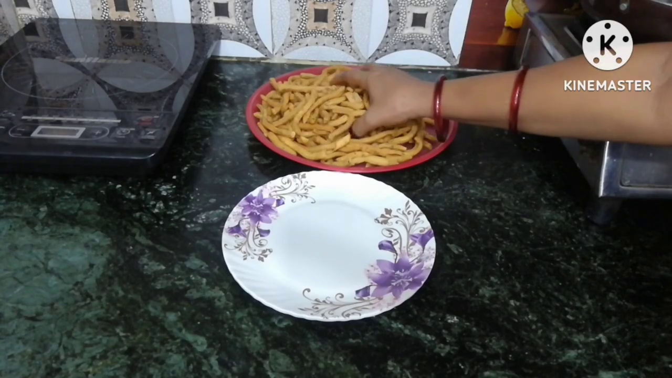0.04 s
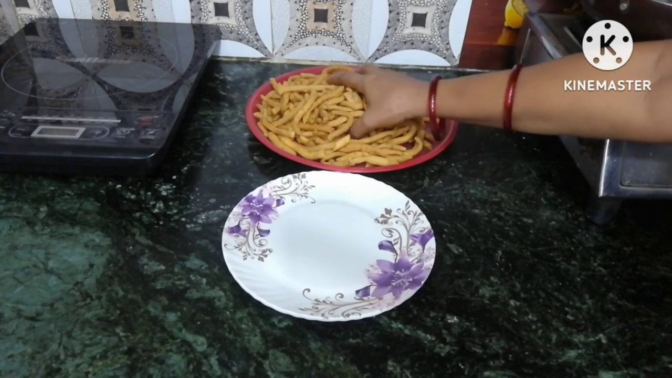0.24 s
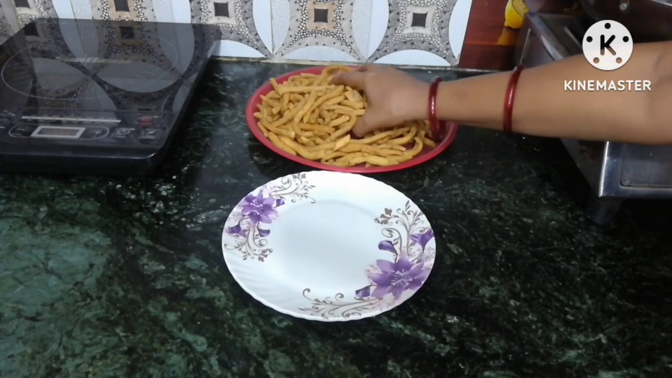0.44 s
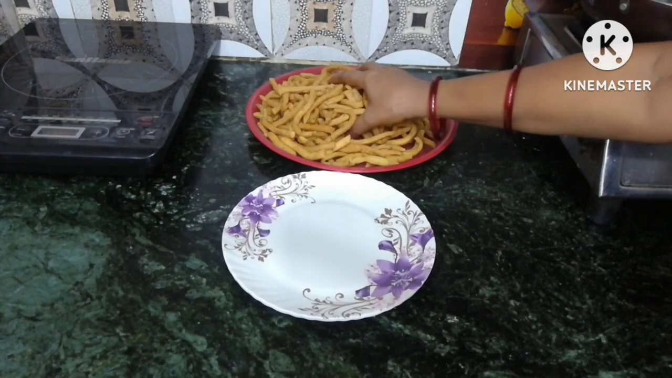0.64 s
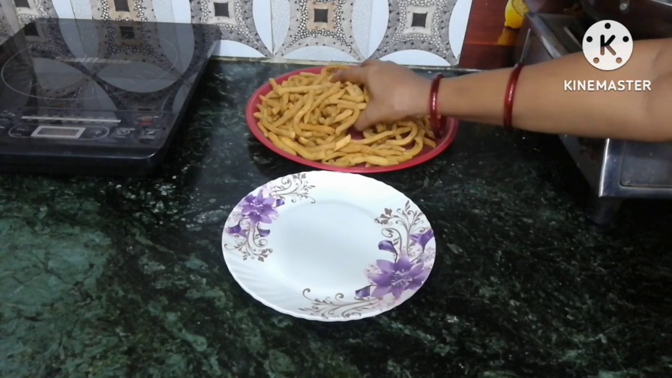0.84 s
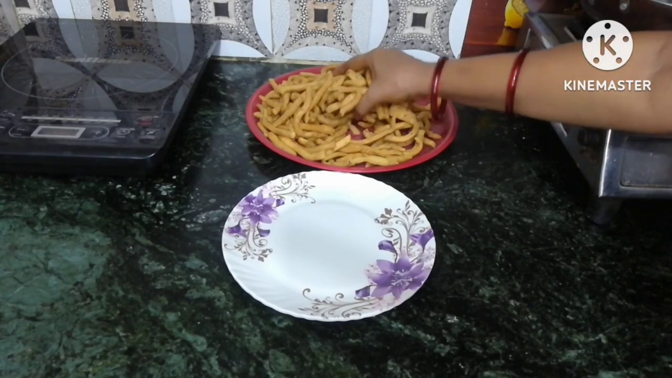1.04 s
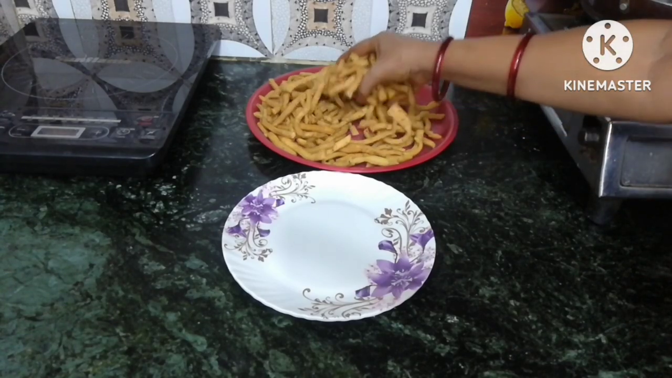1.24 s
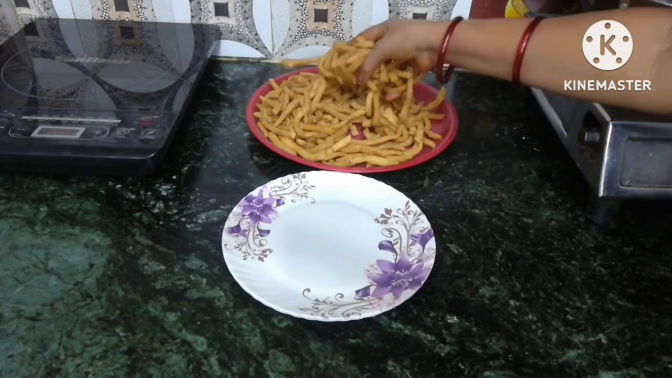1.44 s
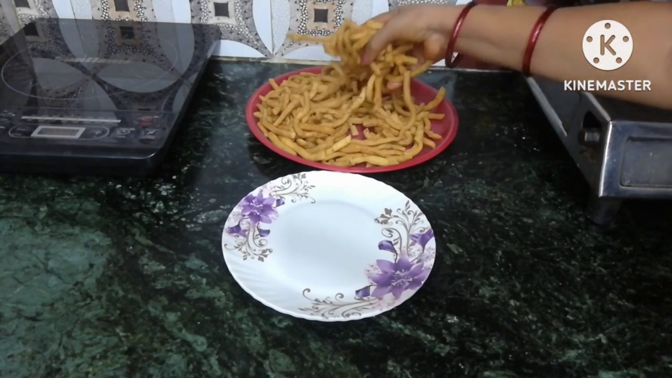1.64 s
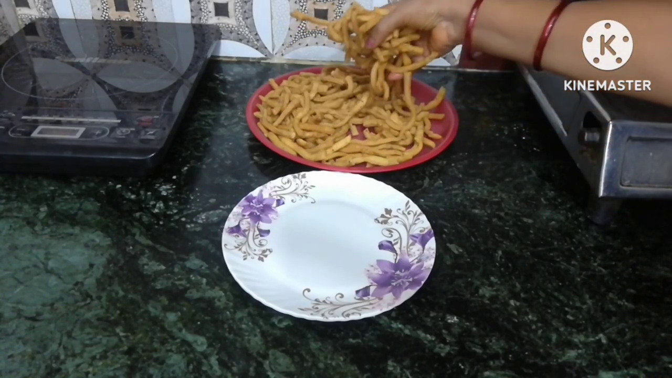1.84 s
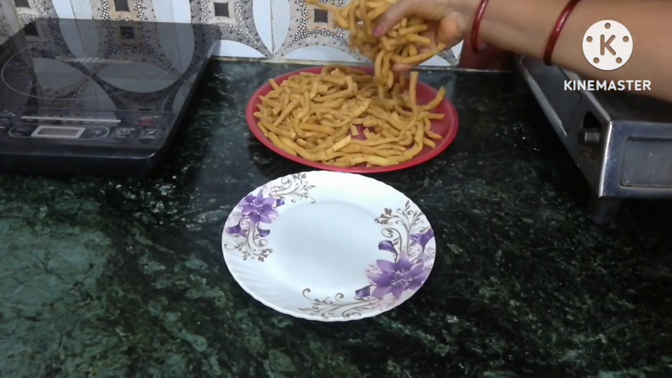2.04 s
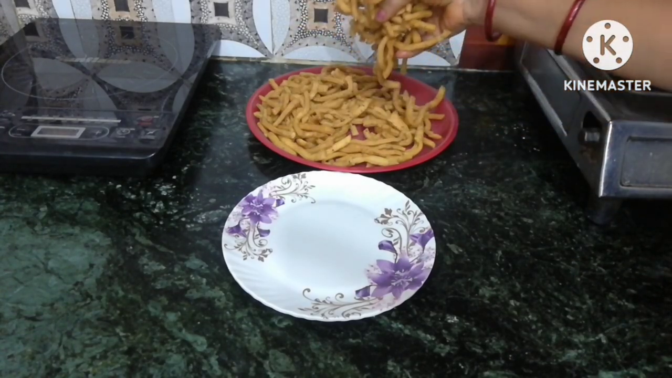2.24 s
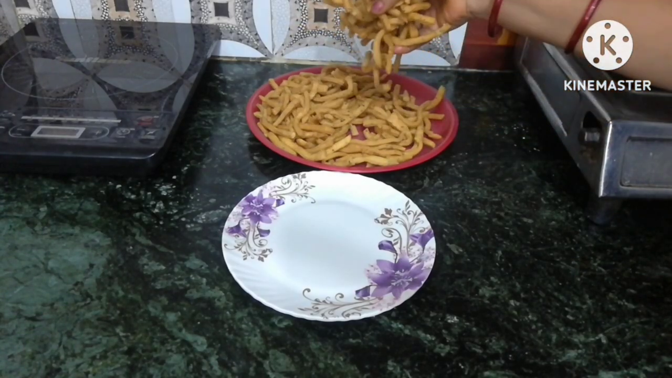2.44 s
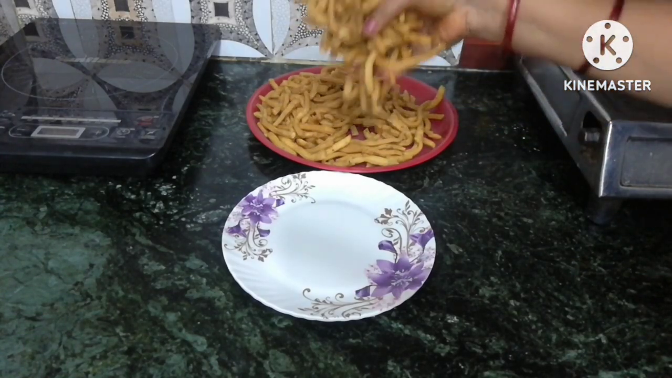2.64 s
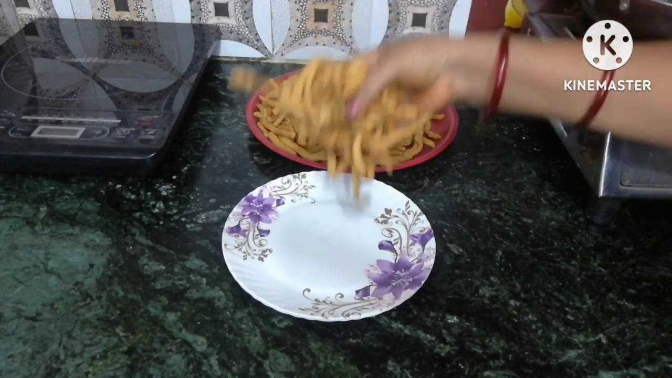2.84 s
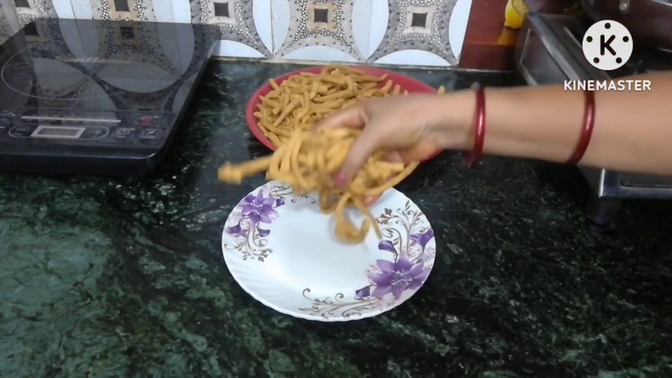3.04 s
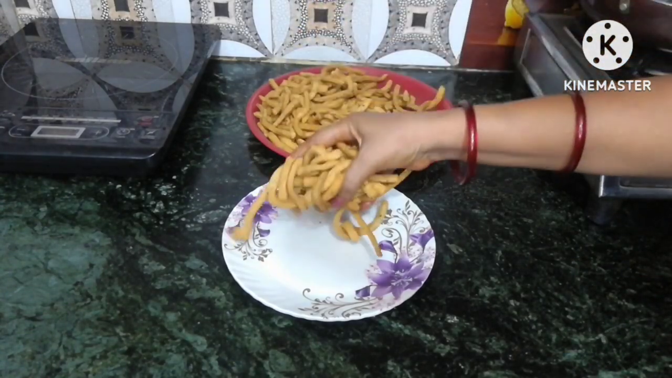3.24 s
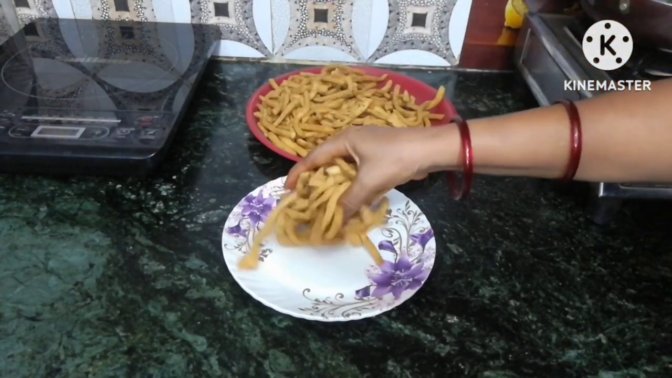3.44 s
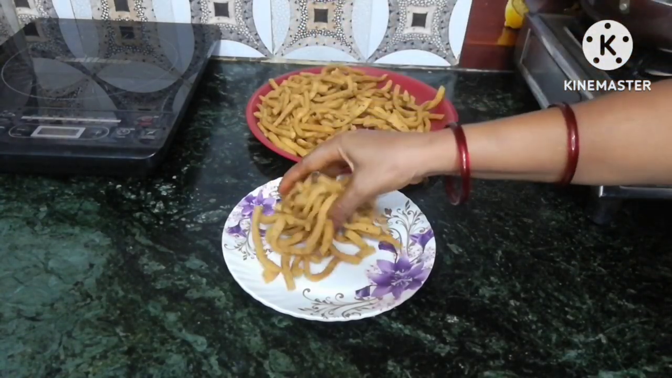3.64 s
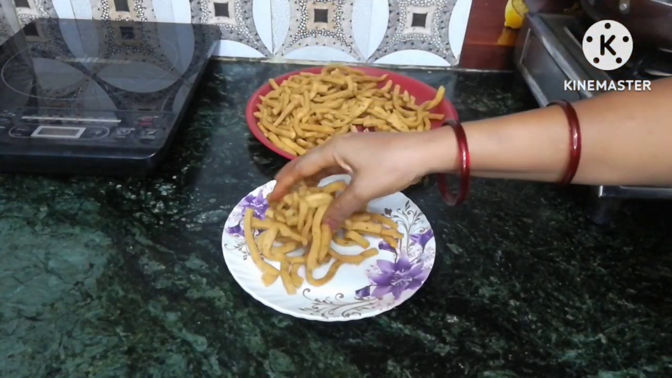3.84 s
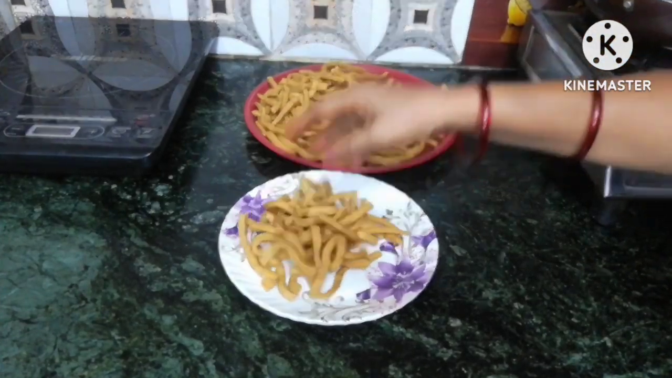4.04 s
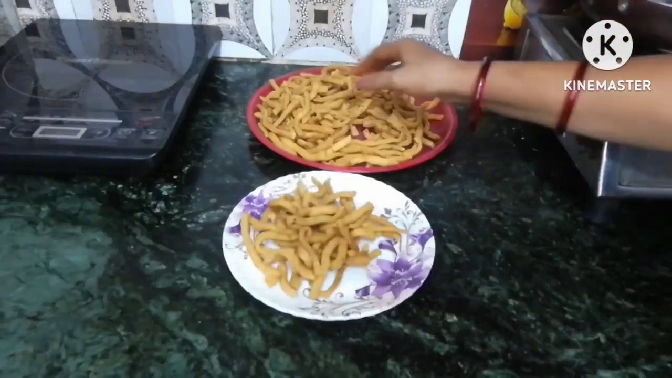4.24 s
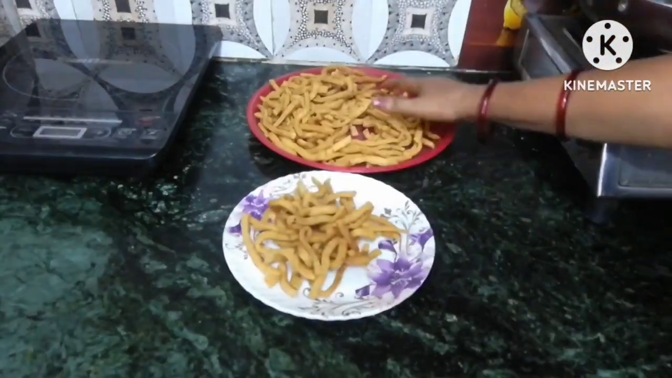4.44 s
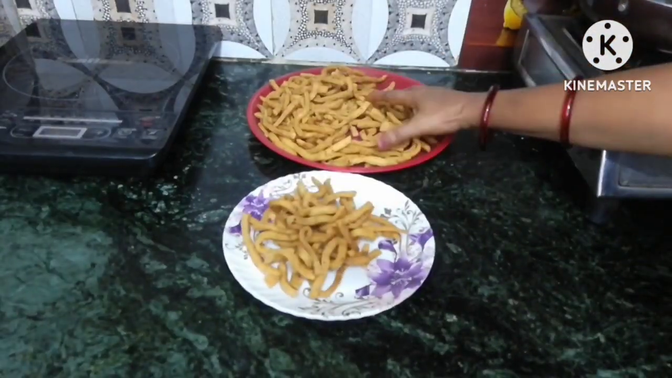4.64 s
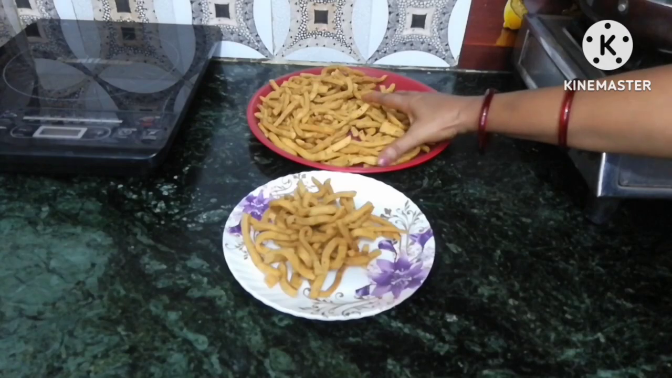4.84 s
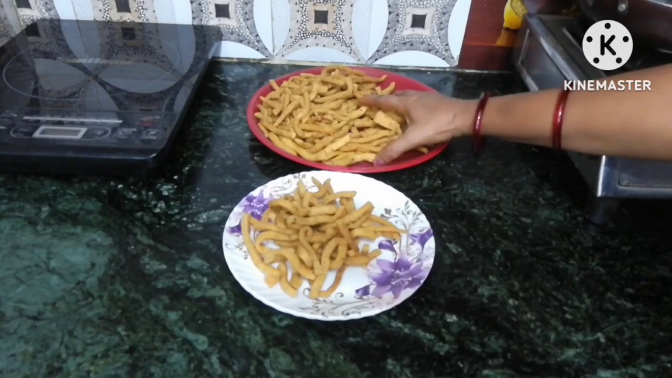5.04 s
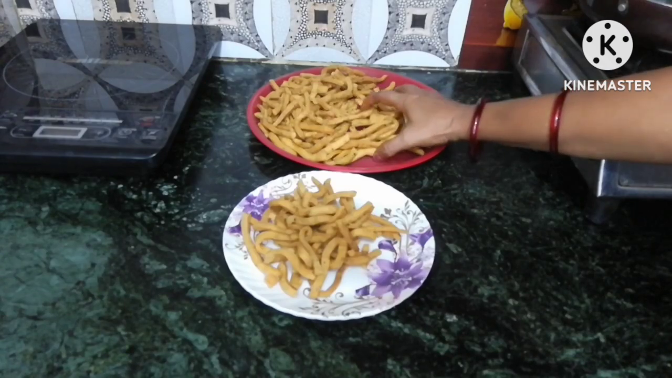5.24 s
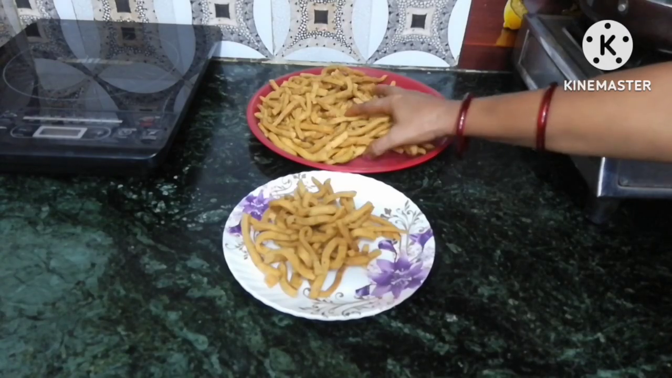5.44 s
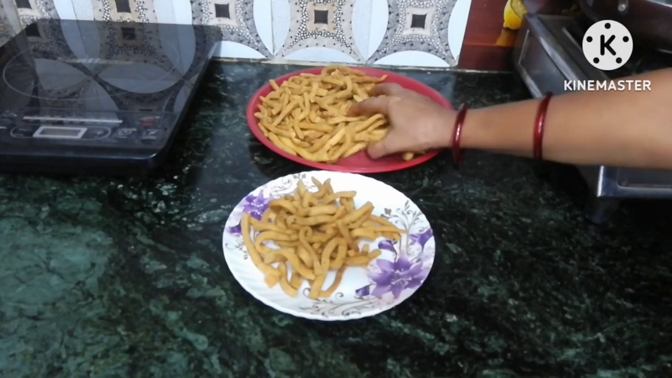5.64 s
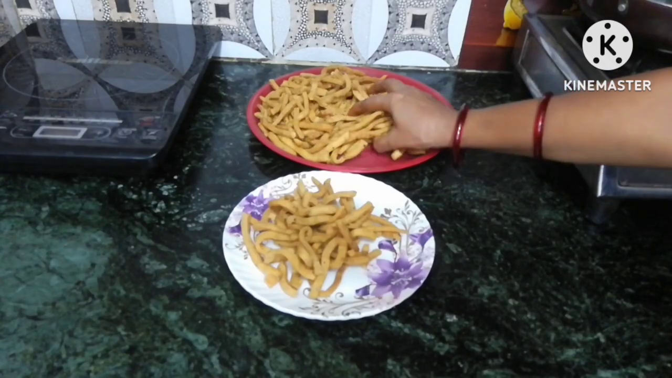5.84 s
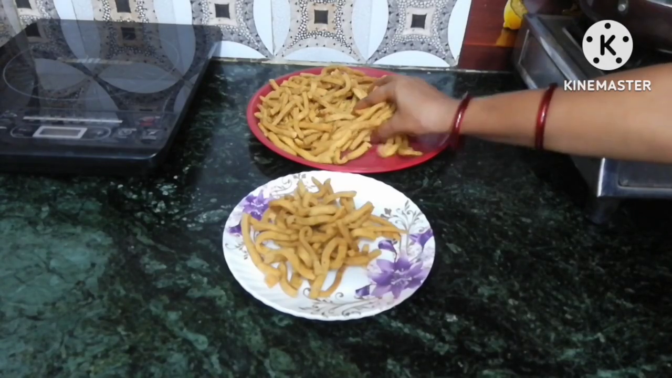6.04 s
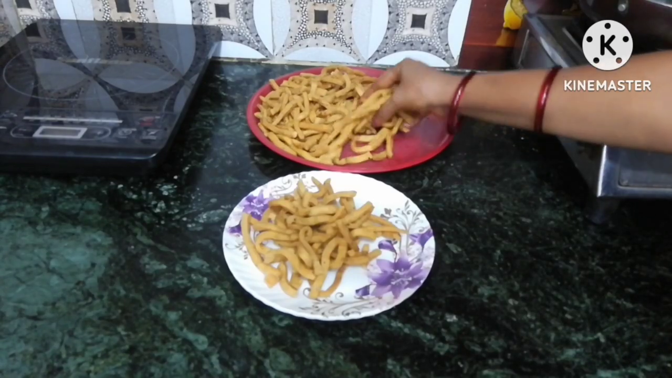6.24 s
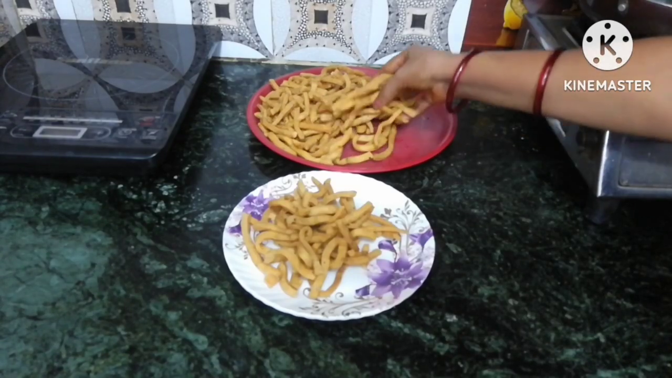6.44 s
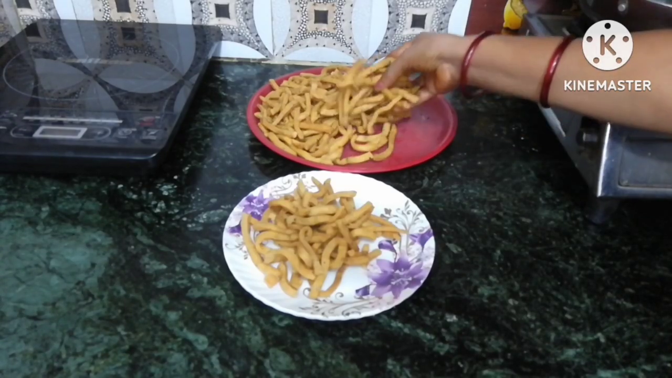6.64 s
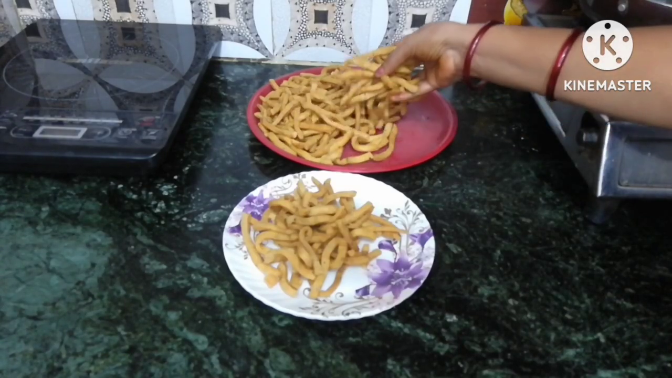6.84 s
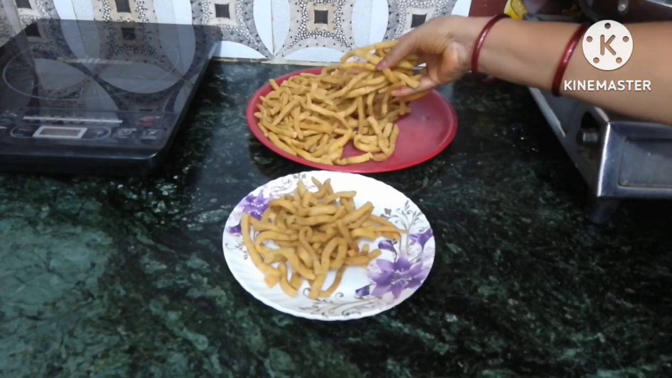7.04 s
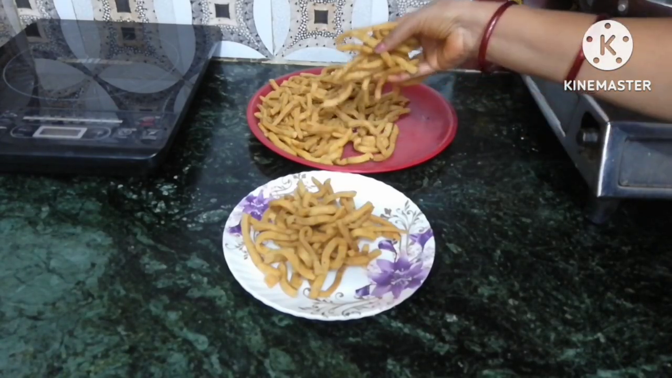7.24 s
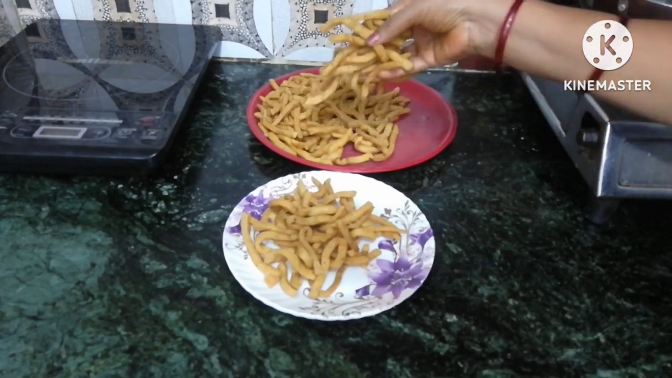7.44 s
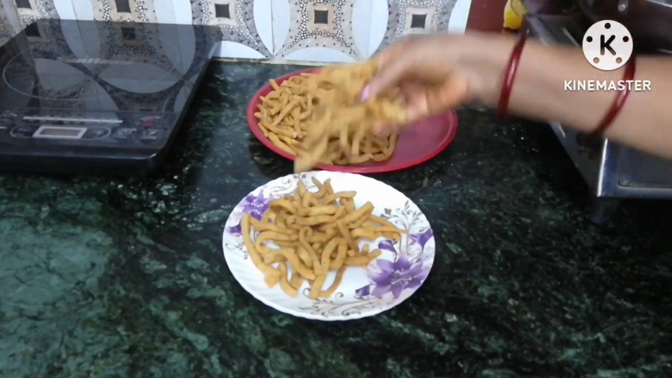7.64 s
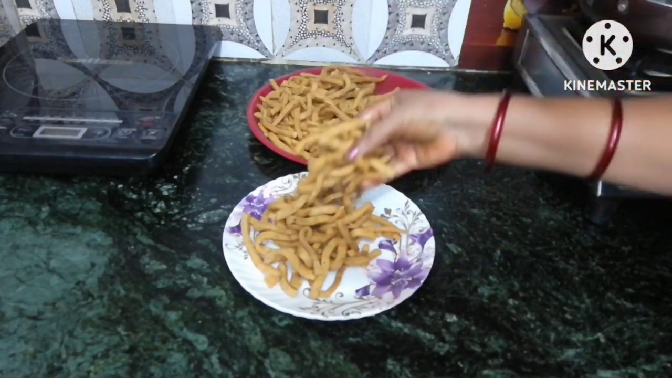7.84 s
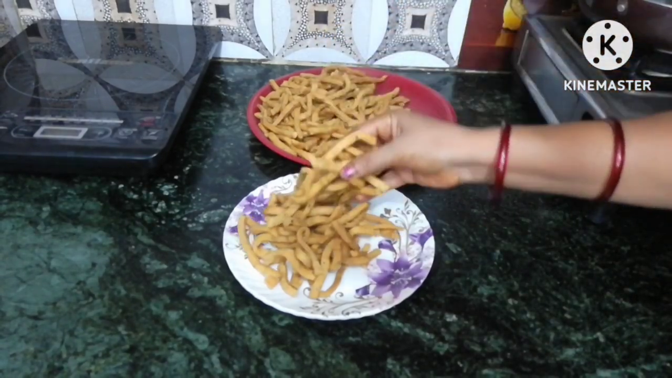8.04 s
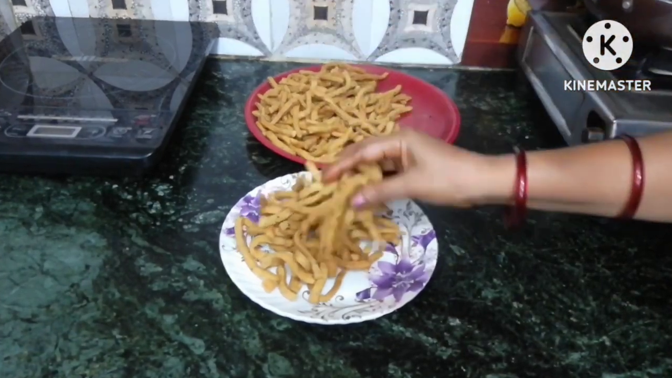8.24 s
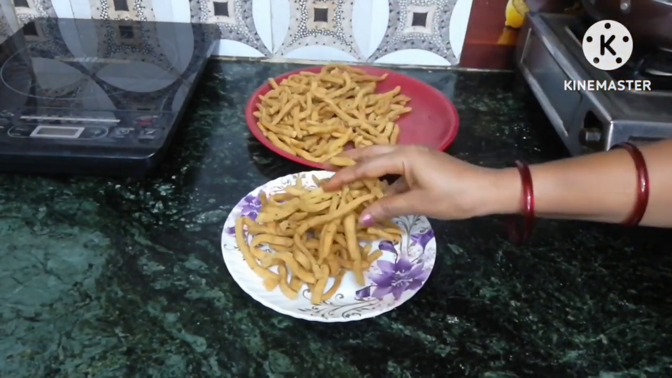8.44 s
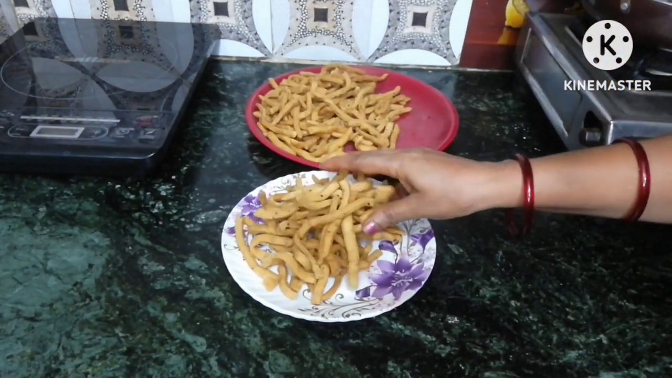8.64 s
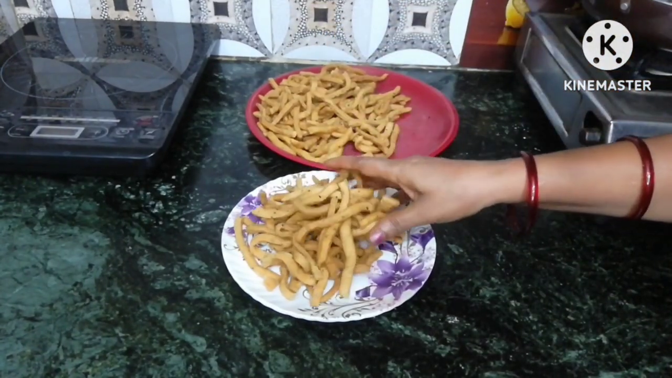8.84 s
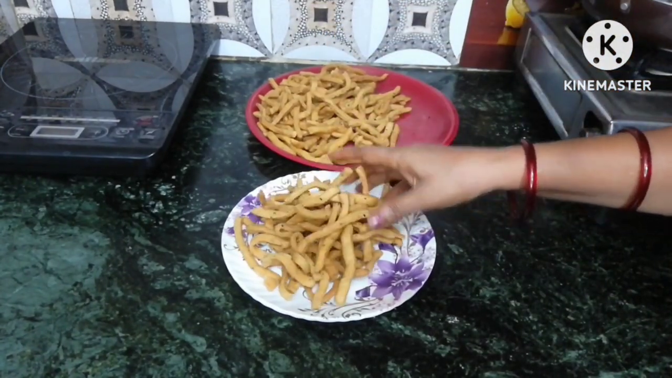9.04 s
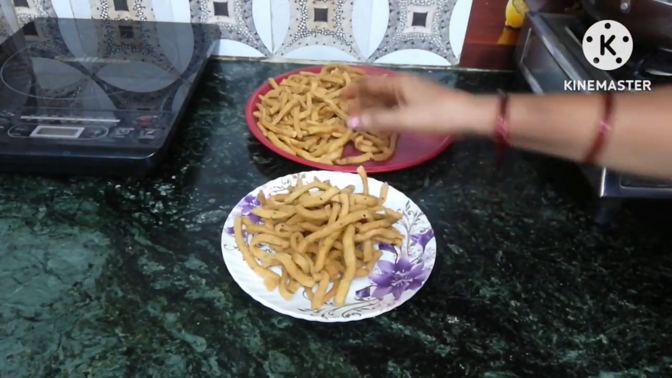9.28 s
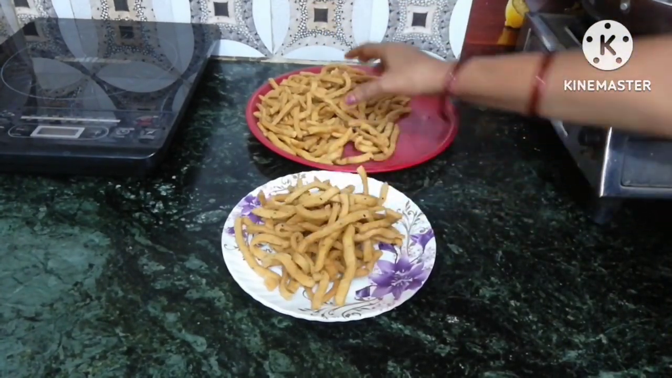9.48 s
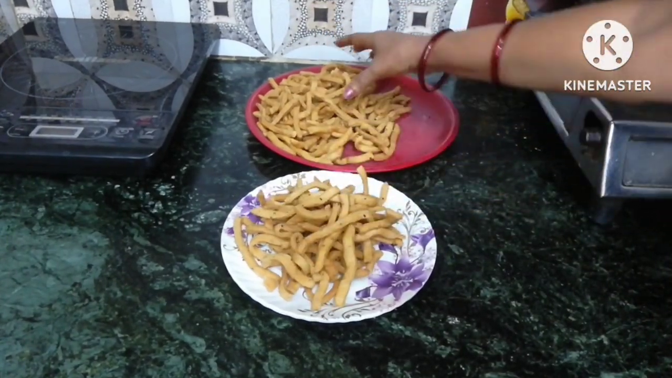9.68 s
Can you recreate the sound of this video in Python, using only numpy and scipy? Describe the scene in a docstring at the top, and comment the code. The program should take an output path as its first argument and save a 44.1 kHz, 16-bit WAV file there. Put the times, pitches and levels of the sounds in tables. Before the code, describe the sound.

A faint low hum and rumble fill a small hard-walled kitchen throughout. From the start, a hand rustles close by in crisp fried sticks on a plastic tray, with dry ticks that cluster around 1.4 seconds and then thin out. At about 3 seconds the first sticks hit a thin plate. The handful tumbles down in a bright, brittle clatter with sharp snaps, loudest from 3.4 to 3.8 seconds, and a few more pieces drop just after 4. From about 4.7 to 7.4 seconds the hand rummages in the tray again, with dense shuffling, crackles and small knocks. A fine hiss swells with the handling and lingers until about 8 seconds. A second handful lands more softly around 8.4. Near 9.2 seconds sticks click and briefly scrape the plate, followed by a light rustle and a faint low drone from 9.5.

```python
"""A small hard kitchen: crisp fried sticks go by the handful from a plastic tray to a thin plate
on a stone counter. Each landing cracks the crust and rings the modes of its dish; hard stick ends
snap on the plate. Dense small contacts make the heap shuffle, rustle and tumble.
A fine hiss swells with the handling and stays on for some seconds, over hum and house rumble.
Near the end sticks scrape the plate and a low drone sets in."""
import sys
import numpy as np
from scipy import signal
from scipy.fft import rfft, irfft, next_fast_len
from scipy.io import wavfile
from scipy.ndimage import uniform_filter1d, map_coordinates

SR = 44100
rng = np.random.default_rng(int(sys.argv[2]) if len(sys.argv) > 2 else 0)


def generate_wav(signal):
    """Clip the signal to [-1, 1] and save it as 16-bit WAV at the path in sys.argv[1]."""
    frames = np.transpose(np.atleast_2d(signal))
    scaled = np.clip(frames, -1, 1) * 32767
    pcm = np.round(scaled).astype(np.int16)
    wavfile.write(sys.argv[1], SR, pcm)


N = 428211

# Hum partials: pitch_hz, level_db
HUM_PARTIALS = [(59.2, -74.5), (118.4, -83), (199.2, -70)]
# Spectra of house noise, rumble, low hum, hiss and crust rustle: freq_hz, relative_density_db
HOUSE_SPECTRUM = [(82, -70), (140, -20.5), (202, -7.5), (236, -13), (292, -12.5), (415, -15.5),
                  (466, -14.5), (565, -26), (954, -18.5), (1160, -21.5), (1580, -22), (2070, -28),
                  (14400, -38.5)]
RUMBLE_SPECTRUM = [(12, -20), (20, 5.5), (38, -10), (100, -4.5), (129, -21), (140, -28), (180, -25),
                   (310, -120)]
LOW_HUM_SPECTRUM = [(70, -51), (88, 10.5), (105, -7.5), (120, 6), (140, -29.5)]
HISS_SPECTRUM = [(880, -51), (1500, -4.5), (1860, -10.5), (2170, -3), (2520, -7.5), (5330, -6),
                 (8080, -6.5), (13600, -19.5), (14400, -93)]
CRUST_SPECTRUM = [(1500, -30), (2500, -4), (3500, 0), (6000, -4), (9000, -16), (13000, -36)]
# Low hum envelope: time_s, level_db
LOW_HUM_LEVELS = [(0.0, -65), (0.75, -72.5), (1.43, -62), (2.08, -70.5), (3.32, -68), (3.57, -52),
                  (3.97, -69.5), (4.27, -57), (4.33, -74), (4.81, -61), (4.89, -70), (5.46, -58.5),
                  (5.6, -69), (6.63, -70.5), (6.68, -58.5), (7.38, -78), (8.11, -67), (9.71, -65)]
# Left-right likeness of noise: freq_hz, correlation
STEREO_CORRELATION = [(60, 0.99), (200, 0.93), (400, 0.35), (700, 0.017), (3000, 0.016)]
# Kitchen decay: freq_hz, t60_s
ROOM_DECAY = [(400, 0.37), (1000, 0.33), (3000, 0.24), (8000, 0.15)]
# Hand moves in the heap: peak_s, rise_s, fall_s, shuffle_db, hiss_db
HAND_MOVES = [(0.02, 0.078, 0.1, -47, -53.5), (0.27, 0.14, 0.1, -50, -59.5),
              (0.475, 0.14, 0.17, -50.5, -55), (0.69, 0.037, 0.14, -52.5, -60.5),
              (0.87, 0.13, 0.12, -50, -58), (1.0, 0.097, 0.15, -52, -54.5), (1.1, 0.044, 0.26, -50, -56.5),
              (1.27, 0.046, .08, -50, -69), (1.36, 0.16, 0.19, -45, -52.5), (1.47, 0.12, 0.032, -58, -58),
              (1.58, 0.041, 0.25, -52, -60.5), (1.76, 0.13, 0.073, -51.5, -63),
              (1.85, 0.045, 0.13, -58, -66), (2.1, 0.067, 0.057, -64, -67),
              (2.325, 0.039, 0.022, -48, -58.5), (2.44, 0.2, 0.13, -59, -71),
              (3.11, 0.061, 0.26, -56, -56.5), (3.4, 0.014, 0.68, -45, -47.5),
              (3.56, 0.065, 0.15, -33.5, -46), (3.72, 0.12, 0.052, -39, -48), (4.07, 0.036, 0.09, -42, -65),
              (4.17, 0.11, 0.19, -50.5, -45), (4.76, 0.38, 0.063, -50, -57.5), (4.93, .06, 0.042, -61, -73),
              (5.1, 0.079, 0.12, -46.5, -53), (5.22, 0.075, 0.056, -46, -49.5),
              (5.59, 0.089, 0.091, -43.5, -59), (5.75, 0.11, 0.041, -44, -51.5),
              (5.93, 0.034, 0.15, -60, -70), (6.19, 0.083, 0.076, -43, -51.5),
              (6.33, 0.034, 0.036, -41, -52), (6.42, 0.072, 0.18, -46, -59),
              (6.74, 0.046, 0.069, -41, -51.5), (6.875, 0.022, 0.098, -40, -52),
              (6.97, 0.15, 0.19, -47, -65), (7.24, 0.048, 0.11, -48, -68), (7.36, 0.12, 0.15, -52.5, -56),
              (8.35, 0.044, 0.16, -47, -54.5), (8.46, 0.03, 0.097, -53, -57), (8.72, 0.17, 0.21, -63, -64),
              (8.97, 0.11, 0.26, -56, -58.5), (9.28, 0.17, 0.28, -55, -65), (9.58, 0.16, 0.35, -53, -55.5)]
# Floor under the moves: time_s, shuffle_db, hiss_db
HANDLING_FLOOR = [(0, -64, -78), (1.9, -73, -70.5), (3.0, -73, -75), (3.3, -72, -102), (3.95, -70, -60),
                  (4.4, -68, -55.5), (4.7, -57.5, -57), (5.4, -52.5, -55), (6.1, -53, -52.5),
                  (6.7, -54.5, -53.5), (7.0, -48, -51), (7.5, -60.5, -51.5), (8.05, -55.5, -51),
                  (8.3, -64, -61), (8.6, -72, -75), (9.45, -59.5, -73), (9.71, -66, -57)]
# Hand over the plate: start_s, end_s
PLATE_SPANS = [(3.0, 4.3), (8.2, 9.5)]
# Dish modes: pitch_hz, level_db, t60_s
TRAY_MODES = [(610, -8.5, 0.024), (780, -3, 0.036), (905, -4, 0.034), (970, 2, 0.059), (1074, 4, 0.048),
              (1225, 1.5, 0.033), (1433, 0, 0.03), (1650, 4, 0.03), (1770, 4.5, 0.033), (1864, -1, 0.038),
              (2220, -5.5, 0.015), (2354, -4.5, 0.015), (3500, 11, 0.0049), (4160, 13, 0.008)]
PLATE_MODES = [(887, -2, 0.031), (990, 0.5, 0.022), (1290, 3.5, 0.034), (1450, 0.5, 0.048),
               (1530, 0.5, 0.018), (1996, -4, 0.023), (1880, -11, 0.035), (2250, -17, 0.016),
               (2500, -7, 0.042), (3397, 10, 0.029), (3910, -10.5, 0.034), (4030, 5.5, 0.017),
               (4530, 9.5, 0.016), (5750, -3, 0.026)]
# Sticks landing: start_s, mid_db, dull_over_mid_db, bright_over_mid_db, dull_pitch_hz, mid_pitch_hz
TRAY_LANDINGS = [(0.275, -48.5, 7, 0, 1050, 2490), (0.4526, -53, 9.5, 6, 1090, 1630),
                 (0.4744, -46, 3, -9.0, 1210, 1920), (0.6426, -48.5, 2, -7, 1240, 1630),
                 (1.075, -40, -3, -12, 1050, 2220), (1.26, -46, -10, -2, 800, 1770),
                 (1.315, -45, 1, 1.0, 1240, 1750), (1.3355, -28, 1, -17, 1050, 1920),
                 (1.3817, -39, 7, -19.0, 1040, 1750), (1.3958, -35.5, 0, -13.0, 1000, 1760),
                 (1.4381, -44.5, 13, 2.5, 970, 1620), (1.4653, -35.5, 1.5, -24.0, 890, 1650),
                 (1.494, -46.5, 6, -19.0, 820, 1690), (1.5529, -42, 11, -8, 970, 2570),
                 (1.682, -46.5, -14, -4, 1600, 1780), (1.7488, -45.5, 2, -14, 1520, 2290),
                 (2.0703, -47.5, -3, -6, 860, 1640), (2.1077, -44, 1.5, -8, 1450, 1640),
                 (2.3175, -51, 1.5, 1, 1230, 1640), (2.4837, -51, 1, -13.0, 1600, 1620),
                 (4.7637, -29.5, -29, -5, 1360, 2580), (4.7878, -38.5, -26.0, -23.0, 1090, 1830),
                 (5.0224, -47, 6, 0, 1090, 2410), (5.1229, -44, -11.0, 2, 980, 1620),
                 (5.2016, -45.5, 3.5, -9, 1260, 2690), (5.3843, -36, -21.0, -9, 1510, 2250),
                 (5.4408, -43.5, -18.0, -1, 1570, 1770), (5.5858, -31, -11, -11, 1090, 1780),
                 (5.6192, -38, -9, -3.0, 920, 1800), (5.8647, -47, -13, -16.0, 1480, 1730),
                 (5.9204, -46, 5.5, -9.0, 970, 1620), (6.1784, -46.5, 9, 6, 935, 1710),
                 (6.2046, -42.5, 6.5, -4, 930, 1920), (6.3162, -28.5, -14, -10.5, 1600, 1930),
                 (6.346, -34, -26.0, -23.0, 1160, 1870), (6.3854, -43.5, 8, 1, 1070, 2310),
                 (6.4093, -42.5, 6.5, -18, 1120, 1660), (6.723, -30.5, -6, -20, 1080, 1850),
                 (6.7487, -32.5, -10, -17.0, 1090, 1880), (6.7989, -41, 4.5, 1.5, 1080, 1950),
                 (6.8515, -28.5, 0.5, -26, 1450, 1650), (6.8721, -34, -24, -17.0, 780, 1870),
                 (6.975, -29.5, -2, -23, 1050, 1750), (7.0234, -49.5, 15.5, -1, 1060, 2200),
                 (7.0743, -42.5, 1.5, -9.0, 1430, 1740), (7.1741, -51, 10.5, -11.0, 1080, 2010),
                 (7.2271, -51.5, 20, 3, 1060, 2240), (7.3387, -37, 1, -5, 990, 1690)]
PLATE_LANDINGS = [(3.0555, -29, -6, -4.5, 1350, 2450), (3.0966, -36, 5, -3, 1260, 2160),
                  (3.1298, -47, 7, -8.0, 800, 2500), (3.238, -55, 9, 6, 1280, 2510),
                  (3.3515, -41.5, 1, 2, 820, 1840), (3.371, -32.5, -3, -11, 840, 2490),
                  (3.4055, -37, 0, -9.0, 980, 2700), (3.432, -35, -3.5, -6.0, 1310, 2570),
                  (3.4745, -32.5, 0.5, 8, 840, 2480), (3.5136, -21, 2.5, -1, 1020, 2120),
                  (3.5349, -22.5, -7, -10, 1300, 1960), (3.5605, -31, 8, -4, 1430, 2000),
                  (3.5748, -20, -4, -3.5, 1330, 2490), (3.5944, -34, 10.5, -10, 1540, 1710),
                  (3.62, -36, -26, 7, 960, 2490), (3.6394, -25.5, -1.5, -1, 1270, 2500),
                  (3.6868, -29.5, -6, -1, 1300, 2500), (3.71, -37.5, 4, 2, 1050, 2540),
                  (3.7572, -28.5, -10, -3, 1290, 2460), (4.0058, -41, -6, -2, 1290, 2340),
                  (4.0574, -26.5, -2, -3.5, 1310, 2490), (4.069, -42, 9.5, -1, 1290, 2510),
                  (4.1163, -42.5, -10.0, 7, 1280, 2510), (4.1406, -22, -10, -2, 1600, 1880),
                  (4.162, -38.5, 5, -10, 1540, 2000), (4.1765, -30.5, -15, 1, 1270, 2460),
                  (4.1879, -26.5, -10, -10.0, 1340, 2510), (8.3362, -38, 1, -12, 1600, 1620),
                  (8.364, -50, -9, -4.0, 1380, 2260), (8.447, -34.5, 4, -5, 1340, 1840),
                  (9.1288, -44, 1, -4, 1290, 1850), (9.2571, -42, -6, -15.0, 1360, 2470),
                  (9.2983, -32.5, -6, -14, 1440, 2500), (9.329, -47, 2, -9.0, 1280, 2250)]
# Small sticks tumbling: start_s, rise_s, fall_s, level_db, centre_hz, on_plate
TUMBLE_BURSTS = [(3.406, .004, .09, -37.5, 3780, 1), (3.513, .005, .06, -42, 3500, 1),
                 (3.575, .005, .05, -43, 3000, 1), (3.62, .005, 0.054, -44, 3300, 1),
                 (3.69, .01, 0.099, -49, 2800, 1), (4.058, .005, .05, -48, 2600, 1),
                 (4.115, .005, .03, -49, 3700, 1), (4.14, .005, .08, -48, 3300, 1),
                 (8.338, .004, .07, -55, 1700, 1), (8.447, .004, 0.046, -59, 2600, 1),
                 (9.255, .005, .05, -57, 2300, 1), (9.52, 0.037, .3, -56.5, 1940, 0),
                 (1.074, .004, .07, -53.5, 1800, 0), (1.258, .004, .05, -56, 1900, 0),
                 (5.385, .005, .07, -52, 1900, 0), (6.316, .005, 0.08, -44, 1800, 0)]
# Stick ends striking the plate: start_s, level_db, pitch_hz, half_width_cycles, left_over_right_db
END_STRIKES = [(3.3714, -22.5, 5200, 1.6, -7), (3.4053, -6.5, 5100, 0.77, -4), (3.513, -17, 6400, 0.69, -7),
               (4.14, -25.5, 5170, 1.15, 2), (8.337, -32, 6400, 0.6, -4), (8.338, -41.5, 3450, 5, -5),
               (8.446, -38, 3430, 6.2, -3), (8.447, -35.5, 4700, 1.6, -3), (9.299, -46, 3470, 0.83, -3),
               (3.0561, -32, 4400, 1.2, -3), (4.057, -34, 4580, 1.5, -3)]
# Noise bands of scrape and drone: centre_hz, width_hz, start_s, end_s, level_db
SCRAPE_BAND = (1330, 190, 9.12, 9.44, -59)
DRONE_BAND = (410, 60, 9.5, 10.2, -65.5)

DULL_HZ, BRIGHT_HZ = 1600, 3000  # edges of the mid band
EDGE_DB = 16.5  # drop of a swell one rise or fall time from its peak
HEAPED_FROM_S = 4.4  # a heap lies on the plate from here on
TIME_S = np.arange(N) / SR


def amp(db):
    """Gain of a level in dB."""
    return 10 ** (np.asarray(db) / 20)


def unit(x):
    """x at rms 1."""
    return x / np.sqrt(np.mean(x ** 2) + 1e-20)


def along(points, hz):
    """Interpolate (freq_hz, value) rows on a log axis."""
    freq_hz, values = np.transpose(points)
    return np.interp(np.log(hz + 1), np.log(freq_hz + 1), values)


def filtered(x, response):
    """x times a complex frequency response."""
    size = next_fast_len(N + SR // 2)
    return irfft(rfft(x, size) * response(np.fft.rfftfreq(size, 1 / SR)), size)[..., :N]


def add_at(out, start_s, sound, pan_db=0):
    """Mix in a stereo sound; pan_db is left over right."""
    span = out[:, round(start_s * SR):][:, :sound.shape[1]]
    span += amp([[pan_db / 2], [-pan_db / 2]]) * sound[:, :span.shape[1]]


def waver(rate_hz, knots):
    """Smooth random curve."""
    return map_coordinates(rng.standard_normal(knots), [TIME_S * rate_hz])


def patchy(x, depth_db):
    """Patches of random gain in time and frequency."""
    spectra = signal.stft(x, nperseg=512)[2]
    field = uniform_filter1d(rng.standard_normal(spectra.shape[1:]), size=6, axis=0)
    field = uniform_filter1d(field, size=10, axis=1)
    return signal.istft(spectra * amp(depth_db * unit(field)), nperseg=512)[1][:, :N]


def stereo_noise(spectrum, patchy_db):
    """Coloured noise at rms 1, alike on both sides in the bass."""
    def mid_side_gains(hz):
        angle = np.arccos(along(STEREO_CORRELATION, hz)) / 2
        return amp(along(spectrum, hz)) * [np.cos(angle), np.sin(angle)]
    mid, side = filtered(patchy(rng.standard_normal((2, N)), patchy_db), mid_side_gains)
    return unit(np.array([mid + side, mid - side]))


def kitchen(x, wet_db, left_lag_samples=0):
    """Direct sound, three bounces a side off counter and tiles, and a noise tail."""
    hz, t, spectra = signal.stft(rng.standard_normal((2, SR // 4)), SR, nperseg=256)
    decay = amp(-60 * t / along(ROOM_DECAY, hz)[:, None])
    tail = signal.istft(spectra * decay, SR, nperseg=256)[1]
    response = amp(wet_db) * np.pad(tail / np.linalg.norm(tail[0]), ((0, 0), (200, 0)))
    for channel in response:
        channel[rng.integers(30, 200, size=3)] = .45 * rng.uniform(-1, 1, size=3)
    response[[0, 1], [left_lag_samples, 0]] = 1
    return signal.fftconvolve(x[None], response, axes=1)


def resonance(hz, mode_hz, width_hz):
    """Response of one mode, gain 1 at its peak."""
    return 1j * hz * width_hz / (mode_hz ** 2 - hz ** 2 + 1j * hz * width_hz)


def hum():
    """Low partials that waver in level and phase."""
    out = np.zeros(N)
    for hz, db in HUM_PARTIALS:
        gain = np.sqrt(2) * amp(db + waver(rate_hz=12, knots=200))
        drift_rad = 1.22 * waver(rate_hz=12, knots=200)
        out += gain * np.sin(2 * np.pi * hz * TIME_S + drift_rad)
    return out


def house():
    """Steady house noise and rumble, plus a low hum that comes and goes."""
    air = amp(-57.5) * stereo_noise(HOUSE_SPECTRUM, patchy_db=1.5)
    rumble = amp(-67.5) * stereo_noise(RUMBLE_SPECTRUM, patchy_db=0.5)
    low_hum_db = np.interp(TIME_S, *np.transpose(LOW_HUM_LEVELS))
    return air + rumble + amp(low_hum_db) * stereo_noise(LOW_HUM_SPECTRUM, patchy_db=2.5)


def handling():
    """Shuffle and hiss gains: a floor plus one swell per hand move, summed as powers."""
    t = np.arange(0, N / SR + .01, .002)
    peak_s, rise_s, fall_s, *peaks_db = np.transpose(HAND_MOVES)[:, :, None]
    knots_s, *floors_db = np.transpose(HANDLING_FLOOR)
    drop_db = EDGE_DB * np.where(t < peak_s, (peak_s - t) / rise_s, (t - peak_s) / fall_s) ** 1.28
    gains = []
    for peak_db, floor_db in zip(peaks_db, floors_db):
        power = amp(2 * np.interp(t, knots_s, floor_db)) + amp(2 * (peak_db - drop_db)).sum(0)
        gains.append(np.interp(TIME_S, t, np.sqrt(power)))
    return gains


def hiss(gain, shared=0.15, lag_samples=25):
    """Fine dense hiss; a small part is common to both sides, later on the left."""
    left, right = stereo_noise(HISS_SPECTRUM, patchy_db=1.0)
    left = np.sqrt(1 - shared ** 2) * left + shared * np.roll(right, lag_samples)
    return gain * [left, right] * amp([[-1.2], [1.2]])


def contacts(rate_hz, spread_db):
    """Two streams of small unequal impulses."""
    out, count = np.zeros((2, N)), round(2 * rate_hz * N / SR)
    size_db = spread_db * np.minimum(rng.exponential(size=count), 2.5)
    out.flat[rng.integers(2 * N, size=count)] = amp(size_db) * rng.choice([-1, 1], size=count)
    return out


def shuffle(gain):
    """Light contacts ring the dish under the hand; the shifting heap damps now one mode, now another."""
    def ring(modes, softness_db_per_khz=2.24):
        return unit(filtered(ticks, lambda hz: sum(
            (-1) ** k * amp(db - softness_db_per_khz * mode_hz / 1000) * resonance(hz, mode_hz, 22 / t60)
            for k, (mode_hz, db, t60) in enumerate(modes) if mode_hz < BRIGHT_HZ)))
    ticks = contacts(rate_hz=500, spread_db=4)
    over_plate = sum((TIME_S > start_s) & (TIME_S < end_s) for start_s, end_s in PLATE_SPANS)
    heap = ring(TRAY_MODES) * (1 - over_plate) + ring(PLATE_MODES) * over_plate
    no_bass = signal.butter(4, 710, "highpass", fs=SR, output="sos")
    near, far = gain * unit(patchy(signal.sosfilt(no_bass, heap), depth_db=3.5))
    return 0.13 * near + amp(-17) * kitchen(far, wet_db=11.5)[:, :N]


def crust_rustle(gain):
    """Crusts rub in dense bright ticks."""
    ticks = contacts(rate_hz=1700, spread_db=3)
    return amp(-15) * gain * unit(filtered(ticks, lambda hz: amp(along(CRUST_SPECTRUM, hz))))


def landings(events, modes, left_lag_samples, crack_db, crack_t60_s, wet_db, detune, heap_damping=1):
    """Brittle crust cracks and the dish rings, most near the pitches the landing spot favours."""
    out, t = np.zeros((2, N)), np.arange(SR // 14) / SR
    hz, mode_db, t60_s = np.transpose(modes)[:, :, None]
    mode_band = (hz[:, 0] > DULL_HZ).astype(int) + (hz[:, 0] > BRIGHT_HZ)
    edges_hz = [(520, DULL_HZ), (DULL_HZ, BRIGHT_HZ), (BRIGHT_HZ, 7500)]
    bands = [signal.butter(3, edges, "bandpass", fs=SR) for edges in edges_hz]
    no_bass = signal.butter(3, 480, "highpass", fs=SR, output="sos")  # small dishes radiate no bass
    attack = 1 - np.exp(-t / .0004)
    for start_s, mid_db, dull_db, bright_db, dull_hz, mid_hz in events:
        pan_db = rng.normal(-1, 2.5)
        damping = heap_damping if start_s > HEAPED_FROM_S else 1
        level_scatter, pitch_scatter = rng.standard_normal((len(modes), 2)).T[:, :, None]
        octaves_off = np.abs(np.log2(hz / np.where(hz > DULL_HZ, mid_hz, dull_hz))) * (hz < BRIGHT_HZ)
        ring_db = mode_db - 30 * octaves_off + 3 * level_scatter - 60 * t * damping / t60_s
        rings = amp(ring_db) * np.sin(2 * np.pi * hz * (1 + detune * pitch_scatter) * t)
        burst = amp(-60 * t / crack_t60_s) * rng.standard_normal(len(t))
        knock = np.zeros(len(t))
        for k, band_db in enumerate([dull_db, 0, bright_db]):
            crack = amp(crack_db[k]) * signal.lfilter(*bands[k], burst)
            part = attack * (rings[mode_band == k].sum(0) + crack)
            knock += amp(mid_db + band_db) * part / np.abs(part).max()
        add_at(out, start_s, kitchen(signal.sosfilt(no_bass, knock), wet_db, left_lag_samples), pan_db)
    return out


def tumbles(rate_hz=550, spread_octaves=0.49):
    """Small sticks tumble: dense uneven contacts ring the dish modes near a centre pitch."""
    out, size = np.zeros((2, N)), SR // 3
    t, hz = np.arange(size) / SR, np.fft.rfftfreq(size, 1 / SR)
    for start_s, rise_s, fall_s, db, centre_hz, on_plate in TUMBLE_BURSTS:
        hits = rng.random(size) < rate_hz / SR
        size_db = 4 * np.minimum(rng.exponential(size=size), 2.5)
        ticks = hits * amp(size_db) * np.sign(rng.standard_normal(size))
        dish = sum((-1) ** k * resonance(hz, mode_hz, 4.5 / t60_s)
                   for k, (mode_hz, _, t60_s) in enumerate(PLATE_MODES if on_plate else TRAY_MODES))
        focus = np.exp(-(np.log2((hz + 1) / centre_hz) / spread_octaves) ** 2 / 2)
        envelope = np.minimum(t / rise_s, 1) * amp(db - EDGE_DB * np.maximum(t - rise_s, 0) / fall_s)
        clatter = envelope * unit(irfft(rfft(ticks) * dish * focus, size))
        add_at(out, start_s, kitchen(clatter, wet_db=-3.5, left_lag_samples=34 if on_plate else 1))
    return out


def snaps(ring_db=-25, crumble_db=-10, crumble_t60_s=0.028):
    """A hard stick end strikes: a short pulse, crumbling crust, a weak ring of the upper plate modes."""
    out, t = np.zeros((2, N)), np.arange(SR // 14) / SR
    thin = signal.butter(5, 3100, "highpass", fs=SR, output="sos")  # too small to radiate lower
    soft = signal.butter(4, 8000, fs=SR, output="sos")
    for start_s, db, hz, half_width_cycles, pan_db in END_STRIKES:
        widths = t * hz / half_width_cycles
        pulse = np.exp(-(widths - 2) ** 2) * np.sin(2 * np.pi * hz * t)
        ring = sum(amp(mode_db + ring_db - 60 * t / t60_s) * np.sin(2 * np.pi * mode_hz * t)
                   for mode_hz, mode_db, t60_s in PLATE_MODES if mode_hz > BRIGHT_HZ)
        noise = signal.sosfilt(soft, rng.standard_normal(len(t)))
        crumble = amp(crumble_db - 60 * t / crumble_t60_s) * noise
        snap = signal.sosfilt(thin, pulse + (ring + crumble) * np.minimum(widths / 2, 1))
        add_at(out, start_s, kitchen(amp(db) * snap, wet_db=-5.5), pan_db)
    return out


def noise_swell(centre_hz, width_hz, start_s, end_s, db):
    """Narrow, nearly mono noise under an arched envelope."""
    out, size = np.zeros((2, N)), round((end_s - start_s) * SR)
    band = np.exp(-((np.arange(SR // 2 + 1) - centre_hz) / width_hz) ** 2)
    noise = irfft(rfft(rng.standard_normal((2, SR))) * band, SR)[:, :size]
    arch = np.sqrt(np.sin(np.pi * np.arange(size) / size))
    add_at(out, start_s, amp(db) * arch * unit(noise + 0.99 * noise[::-1]))
    return out


def scrape():
    """Sticks dragged over the plate catch and slip."""
    return noise_swell(*SCRAPE_BAND) * amp(2.5 * waver(rate_hz=55, knots=600))


def drone():
    """A low drone sets in near the end."""
    return noise_swell(*DRONE_BAND)


def scene():
    """Sticks on tray and plate over hiss, hum and rumble."""
    shuffle_gain, hiss_gain = handling()
    background = hum() + house() + hiss(hiss_gain)
    drag = scrape()
    tray = landings(TRAY_LANDINGS, TRAY_MODES, left_lag_samples=1, crack_db=[12, 12, 14],
                    crack_t60_s=0.02, wet_db=-1.5, detune=0.027)
    plate = landings(PLATE_LANDINGS, PLATE_MODES, left_lag_samples=34, crack_db=[12, 5, 16],
                     crack_t60_s=0.0055, wet_db=-4.5, detune=0.013, heap_damping=2)
    heap = shuffle(shuffle_gain) + crust_rustle(shuffle_gain)
    return background + heap + tray + plate + snaps() + tumbles() + drag + drone()


def record(dry):
    """Brick-wall low-pass."""
    return filtered(dry, lambda hz: hz < 14430)


dry = scene()
out = record(dry)
generate_wav(out)
```